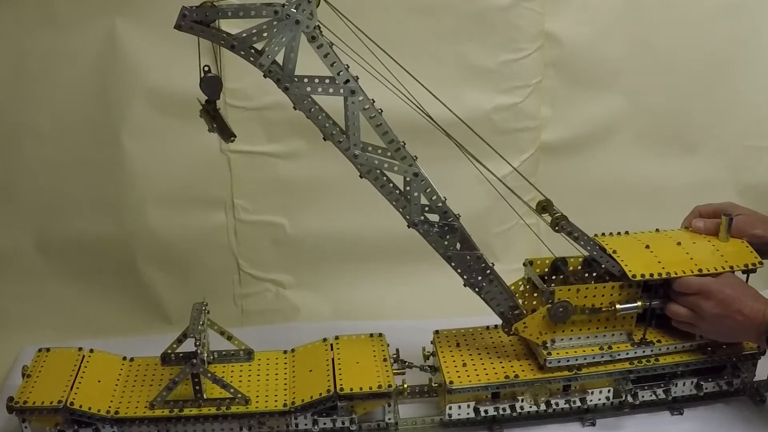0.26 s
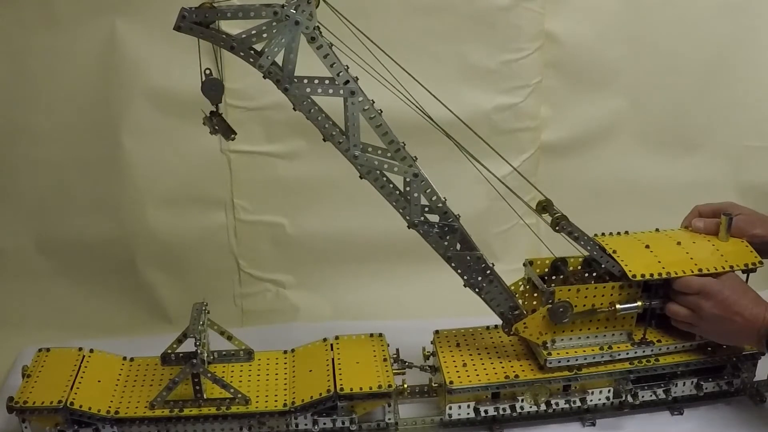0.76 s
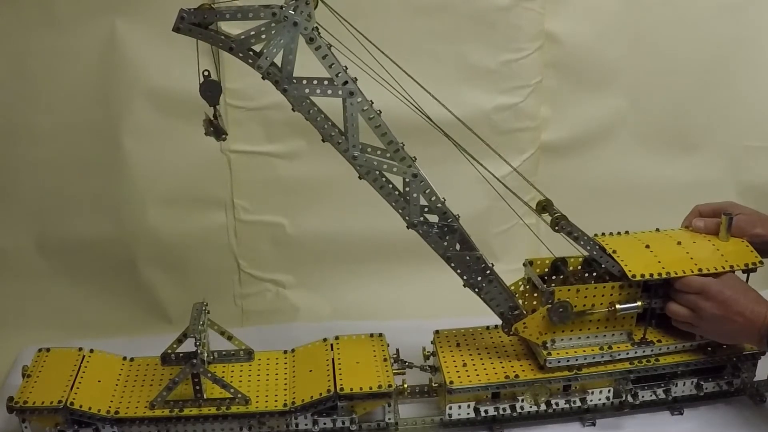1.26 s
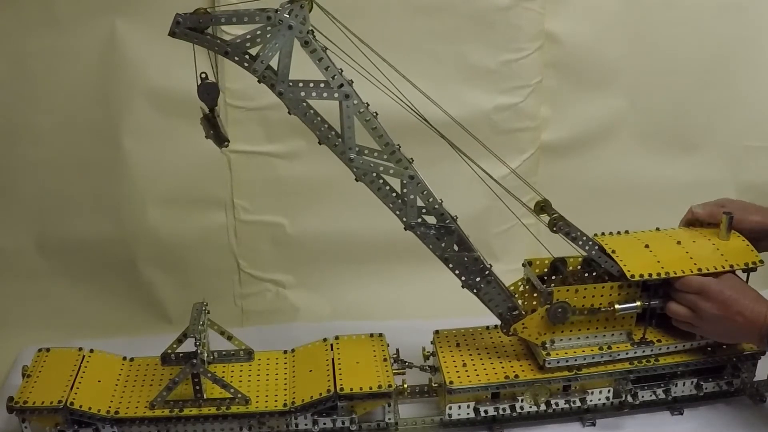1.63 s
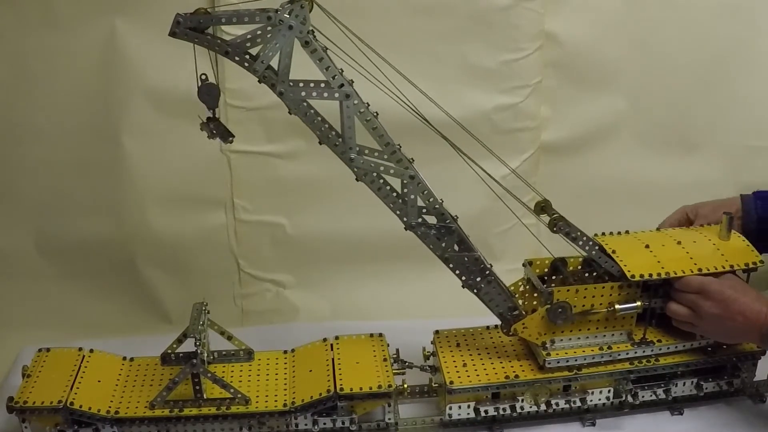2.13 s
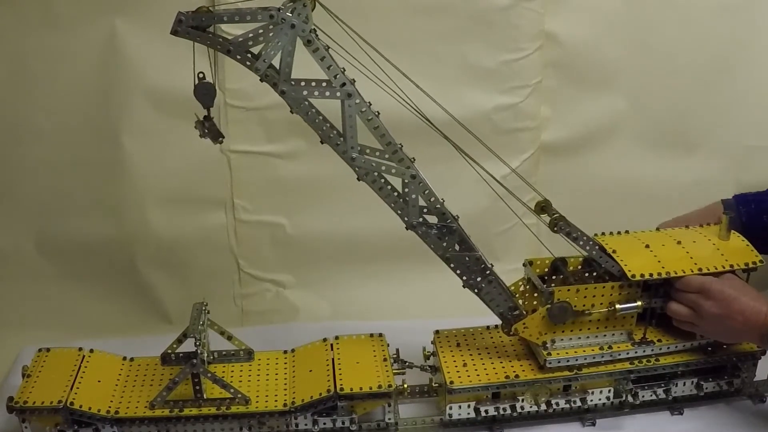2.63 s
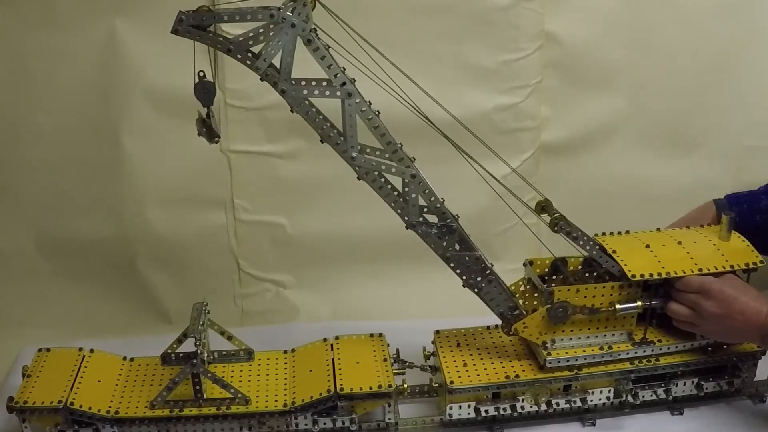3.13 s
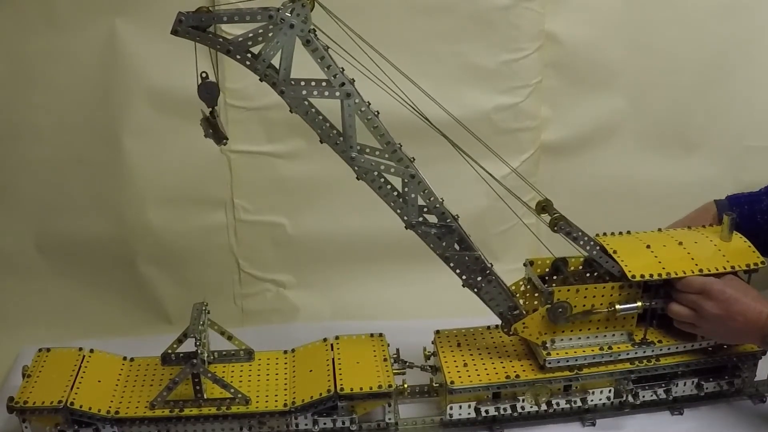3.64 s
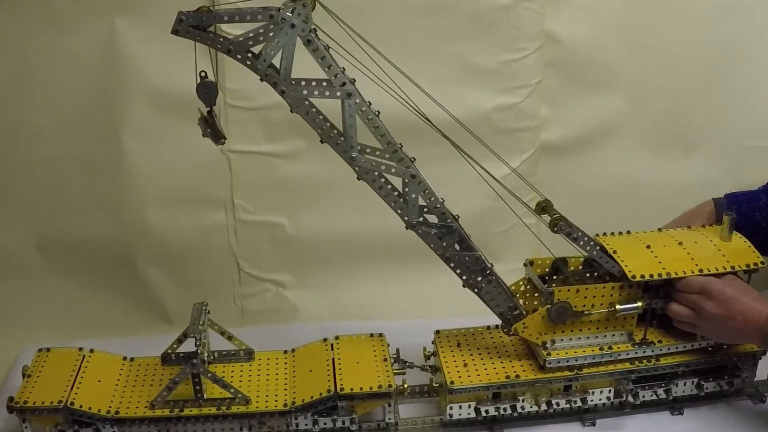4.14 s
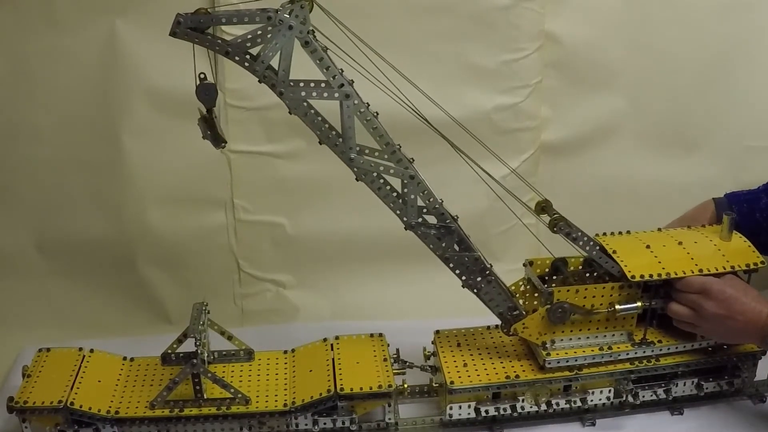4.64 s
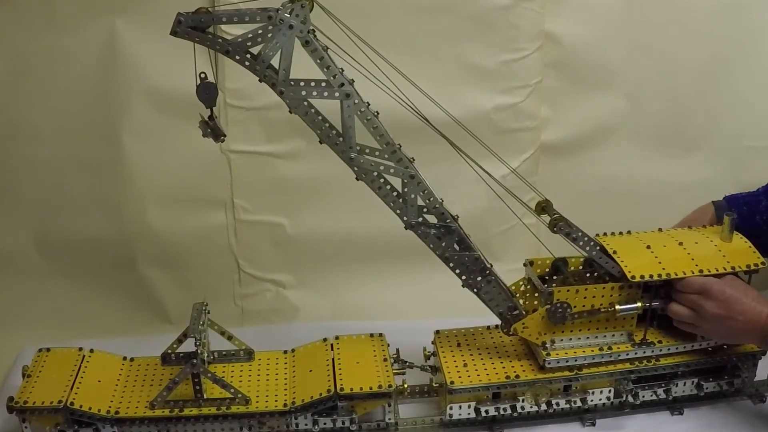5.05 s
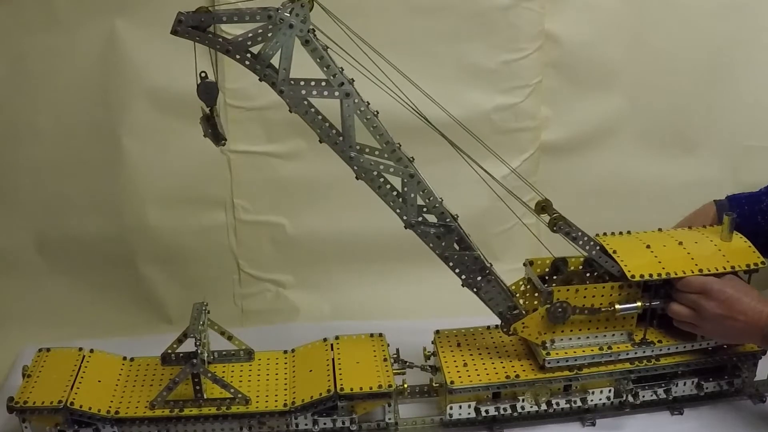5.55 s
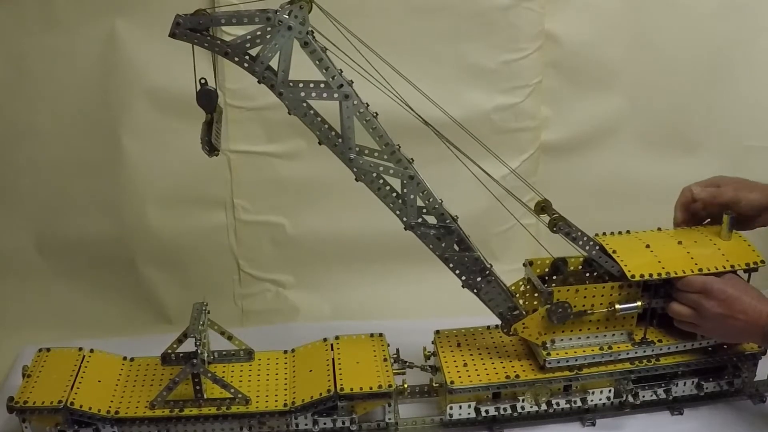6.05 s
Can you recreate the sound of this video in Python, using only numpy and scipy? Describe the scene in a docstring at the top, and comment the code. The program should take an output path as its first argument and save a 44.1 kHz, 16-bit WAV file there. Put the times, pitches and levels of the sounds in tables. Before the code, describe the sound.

In a small quiet room, a metal model crane's electric motor drives rattling gears. A hard shaft clack repeats about twelve times a second, with a thin plate buzzing along. Near five seconds the clacking breaks up and the drive stutters, then the gears run freely, brighter and whining, with a few scattered clicks. Close microphone, little reverberation, faint low room boom and hiss.

```python
"""A small electric motor drives the gears of a model crane built of bolted steel strips, in a small room. From
the start the motor hums faintly, random gear-tooth impacts rattle through the resonant frame, a loose plate
chatters near 2 kHz, and a shaft clacks once a turn, about twelve times a second, after soft grazes. Near five
seconds the clacks become irregular and the drive falters several times. The freed gears run on brighter, the
plate whines on two beating tones, and a few stray clacks, some faint and the last ones firmer, scatter over the
running gears. A low drone of the motor housing near 185 Hz and a faint hiss lie beneath throughout."""
import sys
import numpy as np
from scipy import signal
from scipy.fft import rfft, irfft
from scipy.io import wavfile
from scipy.ndimage import uniform_filter1d

SR = 44100
rng = np.random.default_rng(int(sys.argv[2]) if len(sys.argv) > 2 else 0)


def bounce(signal):
    """Save signal as a 16-bit WAV file at the path given by the first command-line argument."""
    frames = np.transpose(np.atleast_2d(signal))
    limited = np.clip(frames, -1, 1)
    pcm = np.round(limited * 32767).astype(np.int16)
    wavfile.write(sys.argv[1], SR, pcm)


N = 277389

TIME = np.arange(N) / SR
SPAN = 2 ** 14  # samples in one impulse response
HZ = np.maximum(np.arange(SPAN // 2 + 1) * SR / SPAN, 1)

# Drive through the gears, faltering several times near five seconds. Each row: time in seconds,
# relative tooth rattle in dB.
GEAR_DRIVE = [(0, -21), (1.9, -20.5), (4.0, -20.5), (4.78, -21), (4.87, -29.5), (4.93, -25.5), (4.98, -35),
              (5.03, -36), (5.06, -23), (5.11, -28.5), (5.155, -26.5), (5.18, -21), (5.34, -20),
              (5.66, -20), (5.95, -20.5), (6.29, -19.5)]
# Resonances of the frame. Each row: frequency in Hz, width in Hz, lift for shaft blows in dB,
# lift for tooth blows in dB.
FRAME_MODES = [(190, 90, 1, 10), (337, 52, 14, 6), (385, 18, 8, 3), (576, 60, 21, 4), (750, 85, 14.5, 5),
               (888, 70, 9.5, 4), (1185, 90, 5, 5), (1254, 44, 6, 4), (1325, 30, 9, 5), (1405, 37, 10, 6),
               (1495, 35, 4, 5), (2038, 38, 6, 6.5), (2088, 77, 0, 8), (2140, 30, 5, 8.5),
               (2197, 36, 10, 5), (2447, 52, 0, 5), (2515, 50, 7, 8.5), (2605, 80, 7, 3), (2807, 55, 7, 1),
               (2878, 50, 6, 3), (3025, 40, 8, 4), (3255, 85, 9.5, 3), (3346, 64, 5, 2), (3447, 76, 7, 0),
               (3715, 90, 6, 2), (3853, 60, 6, 4), (4315, 43, 0, 6), (4668, 61, 0, 5), (4930, 33, 0, 6),
               (5599, 45, 4, 2), (5840, 110, 4, 1)]
# Broad colour of the blows. Each row: frequency in Hz, relative shaft level in dB, relative tooth level in dB.
BLOW_COLOUR = [(110, -38.5, -36), (152, -10, -15.5), (246, -23.5, -18), (497, -9.5, -3.5), (598, -17, -16),
               (1180, -4.5, -2), (1760, -1.5, -0.5), (2800, 2.5, -1), (4240, 4, 0.5), (4400, -4.5, 1.5),
               (6090, 1.5, 0.5), (7020, -14, -8), (9480, -18, -16.5), (11200, -29, -33),
               (12240, -12.5, -19.5), (16000, -17, -26.5)]
# Stereo width. Each row: frequency in Hz, relative level of side against mid in dB.
STEREO_WIDTH = [(100, -11), (170, -25.5), (700, -23.5), (1300, -54), (3300, -67), (5500, -58),
                (9000, -23.5), (11500, -1.5), (15000, -5)]
BENDING_DELAY_S = .003  # travel time along the strips at 1 kHz

# The loose plate takes a band of the frame's spectrum and follows a share of the drive's swing.
PLATE_HZ, PLATE_WIDTH_HZ = 2102, 316
PLATE_DB, PLATE_FOLLOWS, PLATE_WANDER_DB = -30, 0.59, 1.26  # PLATE_DB is relative
# Flares of the plate. Each row: centre in seconds, length in seconds, lift in dB.
PLATE_FLARES = [(1.527, 0.25, 3.5), (5.287, 0.3, 3.5), (5.855, 0.078, 6), (6.055, 0.052, 6),
                (6.17, 0.077, 5.5)]
# Beating tones of the free-running plate. Each row: frequency in Hz, level against its chatter in dB.
WHINE_TONES = [(2086, -11), (2132, -10)]

# The gears run free of the shaft from FREE_S, and the plate then shakes harder.
FREE_S, FREE_LIFT_DB = 5.16, 2.5
# Resonances that sing out in the free run. Each row: frequency in Hz, width in Hz, relative level in dB.
FREE_MODES = [(2560, 270, -7.5), (4230, 200, -12), (4640, 120, -9), (5590, 110, -9), (6020, 420, -9)]
FREE_RING_DB, FREE_FADE_DB_PER_S, FREE_RISE_S = -27.5, 6.5, 0.094

# Shaft speed, held until the next row. Each row: start in seconds, speed in turns per second.
SHAFT_TURNS = [(0, 12.28), (0.59, 12.53), (0.9, 12.31), (1.8, 12.66), (2.9, 12.59)]
FIRST_CLACK_S, SHAFT_SLOWS_S = 0.0156, 4.85
CLACK_DB, CLACK_SPREAD_DB, CLACK_TREBLE_SPREAD_DB = -19.5, 0.93, 0.8
# Stray catches of the slowed shaft. Each row: start in seconds, level in dB, extra treble in dB.
STRAY_CLACKS = [(4.9058, -20, -2), (5.0405, -23, 0), (5.126, -32.5, -6), (5.167, -31, -4), (5.251, -35, -6),
                (5.356, -26.5, 0), (5.497, -24, 2), (5.625, -24, 2)]
# Altered ringing until the shaft settles in its bearing. Each row: frequency in Hz, width in Hz, lift in dB.
UNSEATED_MODES = [(2425, 40, 9), (2490, 130, -3.5), (3070, 120, -2), (3010, 61, -11), (3880, 90, -2.5),
                  (5450, 150, -8)]
SEATED_S = 2.3
TAIL_DB = 1  # the ringing tail of a clack against its opening crack
# Resonances of the shaft grazing its stop. Each row: frequency in Hz, width in Hz, relative level in dB.
GRAZE_MODES = [(2490, 160, -7), (2946, 130, 0.5), (3926, 140, -1)]
GRAZE_DB = -30

# Motor speed. Each row: time in seconds, speed in turns per second.
MOTOR_SPEED = [(0, 166), (1.7, 214), (2.2, 150), (4.7, 176), (5.05, 140), (5.4, 182), (6.29, 180)]
# Motor hum. Each row: multiple of the turning rate, level in dB.
MOTOR_HUM = [(1, -55.5), (2, -56), (3, -66.5), (5, -58)]

# Drone of the motor housing near 185 Hz, with low rumble and faint hiss. Each row: frequency in Hz, relative
# spectral density in dB per Hz.
BACKGROUND_SPECTRUM = [(20, -30), (45, -25), (70, -18.5), (108, -18), (145, -4), (185, 6), (260, -4.5), (400, -7),
                       (650, -3.5), (1200, 0), (3000, -18), (8000, -6), (11000, -48), (15000, -31)]
BACKGROUND_DB = -40.5
CUTOFF_HZ = 15600


def gear_train(turns):
    """Impact excitation: teeth shake the whole frame, while a loose plate chatters in bursts of its own."""
    rattle_db, = in_time(GEAR_DRIVE)
    gain = frame_gain(order=2)
    # the plate's share of the power; the rest belongs to the frame
    plate_share = 1 / (1 + (2 * (HZ - PLATE_HZ) / PLATE_WIDTH_HZ) ** 6)
    frame_part, plate_part = gain * np.sqrt(1 - plate_share), gain * np.sqrt(plate_share)
    teeth = tooth_blows(turns, per_s=1500, spread_db=2.5, lurch_db=1.78, mains_db=1.34, turn_db=0.5)
    plate = tooth_blows(turns, per_s=900, spread_db=2.5, lurch_db=0.7, mains_db=1.5, turn_db=-3.0)
    rattle = steady(radiate(teeth, frame_part, direct_db=-5.5, t60=0.085, room_db=-14))
    chatter = steady(radiate(plate, plate_part, direct_db=6, t60=0.077, room_db=-35))
    plate_sound = chatter + plate_whine(waver_hz=6.17, waver_db=1.0)
    return from_db(rattle_db - 3.0) * rattle + from_db(plate_level(rattle_db) - 2.5) * plate_sound


def tooth_blows(turns, per_s, spread_db, lurch_db, mains_db, turn_db):
    """Random impacts modulated in force: by torque pulses of the supply and once in each motor turn."""
    hit = rng.random(N) < per_s / SR
    torque_db = mains_db * np.sin(2 * np.pi * 100 * TIME)
    turn_force_db = turn_db * np.sin(2 * np.pi * turns)
    force_db = spread_db * rng.standard_normal(N).clip(-2, 2) + lurch_db * drift(21)
    return hit * rng.choice([-1, 1], N) * from_db(force_db + torque_db + turn_force_db)


def plate_level(rattle_db):
    """Forced response: the plate follows the drive, louder in the free run, and swells in short flares."""
    swing_db = rattle_db - np.median(rattle_db)
    driven_db = PLATE_DB + PLATE_FOLLOWS * swing_db + FREE_LIFT_DB * (TIME > FREE_S)
    flares_db = sum(lift_db * np.exp(-(2 * (TIME - s) / length) ** 2) for s, length, lift_db in PLATE_FLARES)
    return driven_db + flares_db + PLATE_WANDER_DB * drift(6.3)


def plate_whine(waver_hz, waver_db):
    """Beating: two close tones, each wavering in pitch and level, interfere once the gears run free."""
    tones = np.zeros(N)
    for hz, db in WHINE_TONES:
        level = from_db(db + waver_db * drift(9))
        cycles = np.cumsum(hz + waver_hz * drift(15.4)) / SR
        tones += level * np.sin(2 * np.pi * cycles)
    return np.sqrt(2) * tones * np.clip((TIME - FREE_S) / FREE_RISE_S, 0, 1)


def free_run(turns):
    """Impacts on few resonances: freed of the shaft, the teeth skim and ring brighter, then slowly settle."""
    teeth = tooth_blows(turns, per_s=640, spread_db=2.5, lurch_db=6.0, mains_db=7.0, turn_db=2.5)
    since = np.maximum(TIME - FREE_S, 0)
    level = np.minimum(since / FREE_RISE_S, 1) * from_db(FREE_RING_DB - FREE_FADE_DB_PER_S * since)
    return level * steady(radiate(teeth, ring_gain(FREE_MODES), direct_db=2, t60=0.035, room_db=-25))


def clacks_in_time():
    """Periodic contact: one clack per full turn of the shaft, of about the same force, then the stray ones."""
    starts, speeds = np.transpose(SHAFT_TURNS)
    t = TIME[(TIME >= FIRST_CLACK_S) & (TIME < SHAFT_SLOWS_S)]
    turns = np.cumsum(speeds[np.searchsorted(starts, t) - 1]) / SR
    times = np.interp(np.arange(turns[-1]), turns, t)
    levels_db = rng.normal(CLACK_DB, CLACK_SPREAD_DB, len(times))
    trebles_db = rng.normal(0, CLACK_TREBLE_SPREAD_DB, len(times))
    return [*zip(times, levels_db, trebles_db), *STRAY_CLACKS]


def shaft(catches, shift, mode_spread_db, bounce_db, bounce_s):
    """Modal excitation: crack, rebounds and ringing tail vary with the contact, so no two clacks ring alike."""
    crack = scatter(direct_db=-8, echo_s=.0003, t60=.05, room_db=-60, room_t60=.1)
    tail, other_tail, side = [scatter(direct_db=-25, echo_s=.004, t60=.115, room_db=-40, room_t60=.25)
                              for _ in range(3)]
    gain, width = frame_gain(order=1), from_db(at_hz(STEREO_WIDTH, HZ))
    left_right = np.sqrt(2) * width * side * [[1], [-1]]
    shapes = peaks_db([(hz, wide, 1) for hz, wide, *_ in FRAME_MODES])
    unseated_db = peaks_db(UNSEATED_MODES).sum(axis=0)
    out = np.zeros((2, N + SPAN))
    for s, level_db, treble_db in catches:
        colour_db = mode_spread_db * rng.standard_normal(len(FRAME_MODES)) @ shapes
        colour_db += unseated_db * (s < SEATED_S) + treble_db * np.minimum(HZ / 12000, 1)
        # three light rebounds follow the first contact
        waits, forces = rng.random(size=(2, 3))
        rebounds_s = np.cumsum(bounce_s * (.5 + waits))
        taps = 1 + from_db(bounce_db) * forces @ np.exp(-2j * np.pi * np.outer(rebounds_s, HZ))
        # a shifted contact mixes two tails in a different proportion
        angle = shift * rng.standard_normal()
        body = crack + from_db(TAIL_DB) * (np.cos(angle) * tail + np.sin(angle) * other_tail)
        clack = irfft(taps * causal(gain * from_db(colour_db)) * (body + left_right))
        # the level is that of the clack's energy spread over a fiftieth of a second
        clack *= from_db(level_db) * np.sqrt(SR / 50) / np.linalg.norm(clack[0])
        start = int(s * SR)
        out[:, start:start + SPAN] += clack
    return cut_bass(out[:, :N])


def grazes(catches, lead_s):
    """Light contact: the steadily turning shaft skims the stop with three soft taps ahead of each catch."""
    taps = np.zeros(N)
    for s, *_ in catches:
        if s < SHAFT_SLOWS_S:
            taps[((s - lead_s * rng.random(size=3)) * SR).astype(int)] += np.sqrt(SR / 150)
    return from_db(GRAZE_DB) * radiate(taps, ring_gain(GRAZE_MODES), direct_db=6, t60=0.034, room_db=-40)


def motor(turns, waver_db):
    """Rotating imbalance: the rotor hums at low multiples of its speed."""
    hum = np.zeros(N)
    for multiple, db in MOTOR_HUM:
        level = np.sqrt(2) * from_db(db + waver_db * drift(3.0))
        hum += level * np.sin(2 * np.pi * multiple * turns)
    return hum


def floor(side_db, swell_db):
    """Filtered noise: the motor housing's low drone and a faint hiss, gently swelling, with the blows' width
    widened by side_db."""
    hz = np.maximum(np.arange(N // 2 + 1) * SR / N, 1)
    gain = from_db(at_hz(BACKGROUND_SPECTRUM, hz))
    side_gain = gain * from_db(at_hz(STEREO_WIDTH, hz) + side_db)
    mid, side = irfft(rfft(rng.standard_normal((2, N))) * [gain, side_gain], N)
    return from_db(BACKGROUND_DB + swell_db * drift(12.0)) * np.array([mid + side, mid - side]) / np.std(mid)


def radiate(blows, gain, direct_db, t60, room_db):
    """Convolution: each blow rings through frame and room into two channels, alike over most of the range."""
    mid, side = [scatter(direct_db, echo_s=0.00054, t60=t60, room_db=room_db, room_t60=0.17) for _ in range(2)]
    mid = irfft(mid * causal(gain))
    side = irfft(side * causal(gain * from_db(at_hz(STEREO_WIDTH, HZ))))
    response = cut_bass(np.array([mid + side, mid - side]) / np.linalg.norm(mid))
    return signal.fftconvolve(blows[None], response, axes=1)[:, :N]


def scatter(direct_db, echo_s, t60, room_db, room_t60):
    """Multiple scattering: a direct click, then dense dispersed echoes from girders, table and walls."""
    t = np.arange(SPAN) / SR
    fading = from_db(-60 * t / t60) + from_db(room_db - 60 * t / room_t60)
    echoes = rng.choice([-1, 1], SPAN) * fading * np.clip((t - echo_s) * SR, 0, 1)
    # bending waves are slower at low pitch, so the body of a blow follows its tick
    dispersion = np.exp(-4j * np.pi * BENDING_DELAY_S * np.sqrt(1000 * HZ))
    spectrum = rfft(echoes / np.linalg.norm(echoes)) * dispersion + from_db(direct_db)
    # the echoes add fine ripple but no broad colour of their own
    return spectrum * causal(uniform_filter1d(np.abs(spectrum) ** 2, size=21) ** -.5)


def cut_bass(x):
    """Radiation efficiency: so small a body radiates almost no bass."""
    return signal.sosfilt(signal.butter(3, 95, "high", fs=SR, output="sos"), x)


def frame_gain(order):
    """Modal superposition: broad colour plus the frame's resonances, for the shaft (1) or the teeth (2)."""
    return from_db(at_hz(BLOW_COLOUR, HZ, order=order) + peaks_db(FRAME_MODES, order=order + 1).sum(axis=0))


def peaks_db(rows, order=2):
    """Resonance curves: the lift in dB that each mode adds at every frequency, one row per mode."""
    return np.array([row[order] / (1 + (2 * (HZ - row[0]) / row[1]) ** 2) for row in rows])


def ring_gain(rows):
    """Resonance curves summed as gains: a few modes standing alone."""
    return sum(from_db(db) / (1 + (2 * (HZ - hz) / width) ** 2) for hz, width, db in rows)


def causal(gain):
    """Minimum phase: with this gain, resonances ring after the blow, never before."""
    cepstrum = irfft(np.log(gain + 1e-6))[:SPAN // 2]
    return np.exp(rfft(np.r_[cepstrum[0], 2 * cepstrum[1:]], SPAN))


def steady(x):
    """Level normalization: unit power over a twelfth of a second; the faster grain stays."""
    return x / np.sqrt(uniform_filter1d(np.mean(x ** 2, axis=0), size=3600) + 1e-12)


def drift(rate):
    """Low-passed noise: a smooth random wander of unit rms, rolling off around rate in Hz."""
    hz = np.arange(N // 2 + 1) * SR / N
    return rms_one(irfft(rfft(rng.standard_normal(N)) / (1 + (hz / rate) ** 2), N))


def rms_one(x):
    """Root mean square: scale to unit rms."""
    return x / np.sqrt(np.mean(x ** 2) + 1e-20)


def in_time(rows):
    """Linear interpolation: each column of a curve at every sample."""
    s, *columns = np.transpose(rows)
    return [np.interp(TIME, s, c) for c in columns]


def at_hz(rows, hz, order=1):
    """Logarithmic interpolation: one column of a spectrum, read on a log-frequency axis."""
    rows = np.array(rows)
    return np.interp(np.log(hz), np.log(rows[:, 0]), rows[:, order])


def from_db(db):
    """Decibel law: decibels to amplitude gain."""
    return 10 ** (np.asarray(db) / 20)


def scene():
    """Superposition: gears, shaft and motor sound together over a steady background of drone and hiss."""
    speed, = in_time(MOTOR_SPEED)
    turns = np.cumsum(speed * (1 + 0.0066 * drift(6.0))) / SR
    gears = gear_train(turns) + free_run(turns)
    catches = clacks_in_time()
    clacks = shaft(catches, shift=.7, mode_spread_db=1.26, bounce_db=-10.5, bounce_s=.005)
    clacks = clacks + grazes(catches, lead_s=.007)
    return gears + clacks + motor(turns, waver_db=0.5) + floor(side_db=3.5, swell_db=1.1)


def record(dry):
    """Band limiting: a steep elliptic low-pass cuts the top."""
    return signal.sosfilt(signal.ellip(12, .1, 90, CUTOFF_HZ, fs=SR, output="sos"), dry)


dry = scene()
out = record(dry)
bounce(out)
```